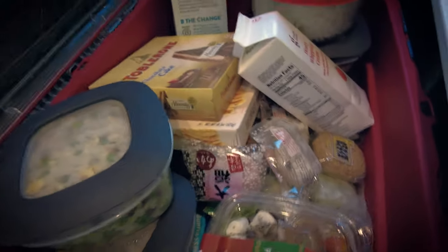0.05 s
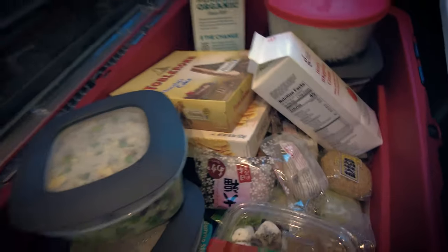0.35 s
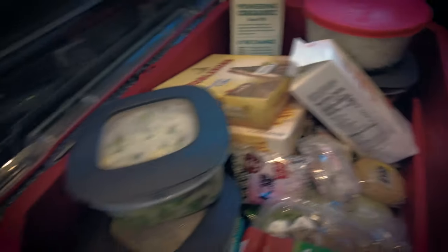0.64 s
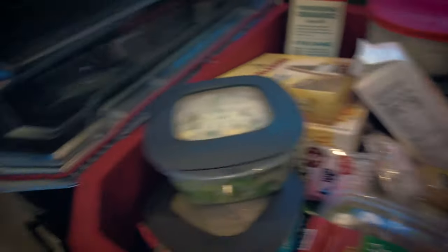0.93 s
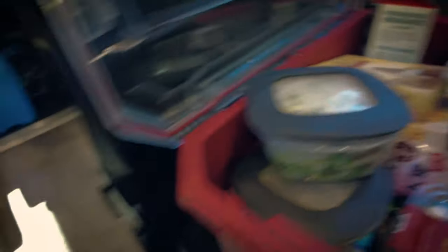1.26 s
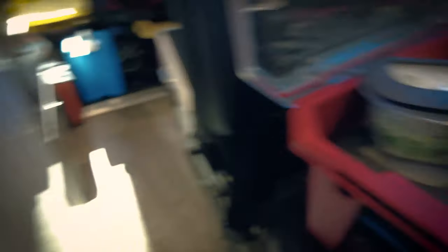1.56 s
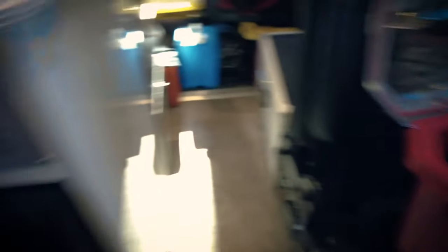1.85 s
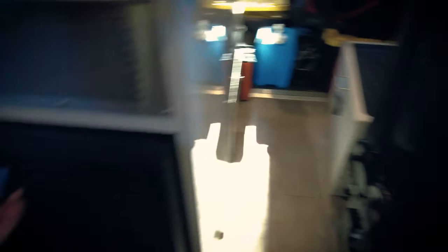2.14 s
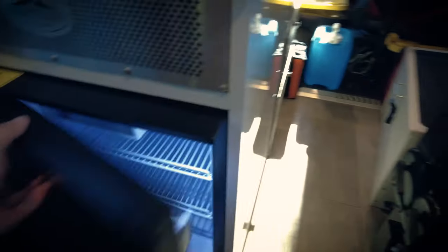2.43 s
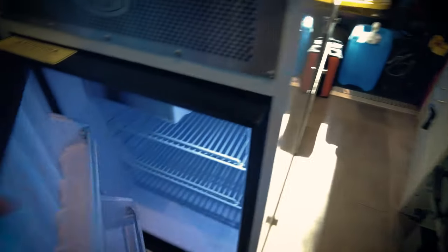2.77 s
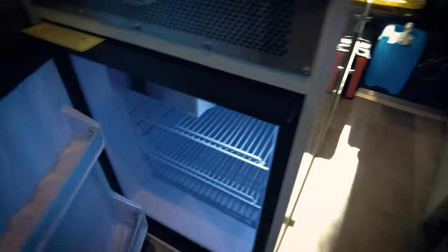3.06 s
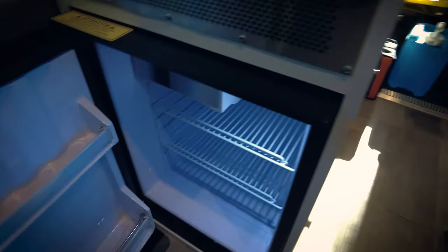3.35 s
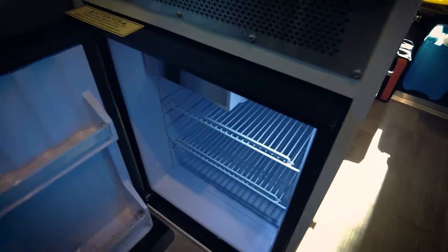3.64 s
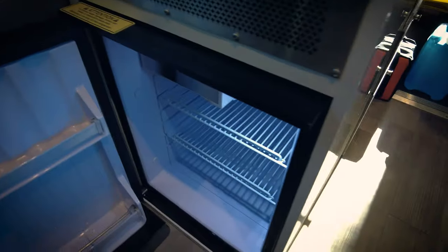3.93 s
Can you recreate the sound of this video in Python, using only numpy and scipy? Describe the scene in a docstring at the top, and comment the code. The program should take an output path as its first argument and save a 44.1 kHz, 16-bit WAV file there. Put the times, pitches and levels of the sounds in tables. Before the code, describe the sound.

A small fridge door opening in a van is the main sound, over a steady low rumble and faint hiss. For the first two seconds there are only soft knocks, clothes rustle and tiny plastic squeaks. At 2.4 seconds the door thuds dully, and at 2.7 the latch snaps loudly as the rubber seal peels away. A faint hum follows, and near 3.9 a hand bumps the microphone.

```python
"""Opening a fridge in a van

A small fridge door is pulled and thuds against its catch. The latch snaps free, and the impact excites
the modes of latch and panel; the rubber seal peels off and the fridge's hum grows louder. Friction
makes clothes rustle and plastic squeak, and small knocks sound over the cabin's low rumble and hiss.
Last, a hand bumps the microphone."""
import sys
import numpy as np
from scipy import signal
from scipy.fft import rfft, irfft
from scipy.io import wavfile

SR = 44100
rng = np.random.default_rng(int(sys.argv[2]) if len(sys.argv) > 2 else 0)


def wav_record(signal):
    """Record a signal, one row per channel, as 16-bit PCM in the file named by sys.argv[1]."""
    frames = np.transpose(np.atleast_2d(signal))
    bounded = np.clip(frames, -1, 1)
    # unit amplitude maps onto the largest positive 16-bit level
    quanta = np.round(bounded * 32767).astype(np.int16)
    wavfile.write(sys.argv[1], SR, quanta)


N = 176400
T = np.arange(N) / SR
FREQS = np.maximum(np.arange(N // 2 + 1) * SR / N, 1)
SNAP_S = 2.6832  # the latch lets go


def latch_snap():
    """Impact excitation: sharp contacts set door and latch ringing, and the cabin reverberates."""
    # contacts of the slipping catch: start_s, level_db
    contacts = [(2.6833, -9.5), (2.6843, -11.5), (2.6871, -19.5), (2.69, -18.5)]
    # spectrum of the snap: frequency_hz, gain_db
    colour = [(90, -35), (170, -23), (250, -0.5), (340, -5.5), (520, -7.5), (700, -3), (1080, -8),
              (1400, -1.5), (1700, -6), (1980, -15.5), (2250, -8.5), (2600, -5), (3200, -4), (4700, -9.5),
              (5900, -18), (9000, -19.5), (12000, -31), (15000, -22.5)]
    # damping of the densely overlapping modes: frequency_hz, t60_s
    damping = [(150, 0.2), (400, 0.12), (1000, 0.15), (3000, .13), (7000, .12), (15000, .11)]
    crack = coloured(white(), colour) * sum(undb(db) * strike(s, 0, t60=0.011) for s, db in contacts)
    ring_spectrum = rfft(coloured(white(), colour))
    log_centres = np.log(np.array(damping)[:, 0])
    ring, rise_s = 0, 0.0011
    for (_, t60), selector in zip(damping, np.eye(len(damping))):
        share = np.interp(np.log(FREQS), log_centres, selector)  # overlapping triangular bands
        ring = ring + irfft(ring_spectrum * share, N) * strike(SNAP_S, rise_s, t60)
    tail = coloured(white(), colour) * strike(SNAP_S, rise=.015, t60=0.29)
    bolt_tick = shaped(white(), band(9700, 28000)) * strike(2.6845, 0, t60=0.0032)  # bolt hits its stop
    return crack + undb(-8.5) * bolt_tick + undb(-10.5) * ring + door_modes(rise_s) + undb(-25.5) * tail


def door_modes(rise_s):
    """Free vibration: each mode of the struck panel and latch is a damped sinusoid."""
    # modes of the door panel: pitch_hz, level_db, t60_s
    panel = [(256, -25, 0.12), (345, -23.5, 0.28), (404, -25.5, 0.18), (600, -22, 0.11), (704, -19, 0.16),
             (854.5, -19.5, 0.21), (941, -21, 0.14), (1202, -19, .13), (1370, -18, 0.11), (1450, -19, .1),
             (1650, -19.5, 0.1), (1742, -24.5, 0.14)]
    # modes of the latch: pitch_hz, level_db, t60_s
    latch = [(1530, -13, 0.017), (2530, -20, 0.1), (2730, -21, .12), (2920, -23.5, 0.11),
             (3020, -16.5, 0.1), (3310, -23.5, .11), (3791, -22.5, 0.12), (4293, -28, 0.13),
             (4870, -19, 0.032)]
    return direct(sum((-1) ** k * undb(db) * damped_sine(hz, SNAP_S, rise_s, t60)
                      for k, (hz, db, t60) in enumerate(panel + latch)))


def door_thuds():
    """Damped oscillation: each jolt of the pulled door sounds one low, dying tone."""
    # jolts of the door: start_s, level_db, pitch_hz, t60_s
    thuds = [(2.429, -20, 69.5, 0.16), (2.461, -27, 94.4, 0.41), (2.54, -25.5, 64.3, 0.23),
             (2.762, -32, 146, 0.14), (2.852, -47.5, 89, 0.33)]
    return direct(sum(undb(db) * damped_sine(hz, s, 0.0063, t60) for s, db, hz, t60 in thuds))


def seal_peel():
    """Adhesive failure: the rubber leaves the frame in many tiny releases that merge into a crackle."""
    # surges of peeling: peak_s, level_db, swell_s, t60_s
    surges = [(2.645, -52.5, 0.016, 0.17), (2.681, -31.5, 0.009, .04), (2.795, -46, 0.038, 0.072),
              (2.828, -37.5, 0.023, 0.12)]
    # spectrum of the peeling rubber: frequency_hz, gain_db
    colour = [(200, 0.5), (650, 0), (950, -13), (1400, 0.5), (2100, -8), (3000, -3.5), (5000, -7),
              (9000, -13.5), (15500, -16.5)]
    return coloured(grains(per_s=6200, spread_db=1.5), colour) * swells(surges)


def handling_clicks():
    """Impulse response: each small knock is a short tick followed by a ring in the cabin."""
    # knocks: start_s, bass_db, middle_db, treble_db, top_db, rise_s, t60_s
    knocks = [(0.376, -39, -54, -66, -73, 0.0029, 0.14), (0.478, -58, -50, -58.5, -64, 0.002, 0.14),
              (0.858, -53, -54.5, -49.5, -62, 0.0023, 0.089), (0.873, -49, -53, -57, -72, 0.0018, 0.087),
              (0.923, -47.5, -53, -53, -55.5, 0.0043, 0.22), (1.170, -49.5, -56, -57.5, -65, 0.0024, 0.32),
              (1.564, -50, -63, -62, -64, 0.003, 0.32), (2.072, -63, -46.5, -54.5, -52.5, 0.002, 0.14),
              (2.167, -62, -55, -53.5, -51.5, 0.0025, 0.19), (2.303, -47.5, -51, -61, -72, 0.0016, 0.13),
              (2.348, -49.5, -51, -61, -62, 0.0065, 0.18),
              (2.4693, -47.5, -44.5, -42.5, -52.5, 0.00088, 0.12),
              (3.103, -48.5, -44.5, -47.5, -60.5, 0.0027, 0.1), (3.727, -41, -40, -49, -58, 0.0051, 0.15),
              (3.855, -34, -36, -43, -45, 0.0035, 0.099)]
    edges_hz = [130, 700, 2200, 5500, 16000]
    bands = [shaped(white(), band(lo, hi) * FREQS ** -.4) for lo, hi in zip(edges_hz, edges_hz[1:])]
    out = 0
    for s, *band_db, rise, t60 in knocks:
        tick = 1.06 * strike(s, rise / 4, t60=0.013)
        noise = sum(undb(db) * part for db, part in zip(band_db, bands))
        out = out + (tick + strike(s, rise, t60)) * noise
    return undb(-1) * out


def clothes_rustle():
    """Sliding friction: cloth catches and slips in fine grains, each band flickering on its own."""
    # spectrum of rubbing cloth: frequency_hz, gain_db
    colour = [(200, -5.5), (500, -1), (950, -6.5), (1600, 3), (2200, -2), (3200, -1.5), (5500, -10.5),
              (9000, -17.5), (15500, -26)]
    # strength of the rustle: time_s, level_db
    levels = [(0, -59), (.27, -79), (.42, -64), (.72, -57), (.82, -70), (.96, -59.5), (1.14, -63),
              (1.28, -65.5), (1.47, -56.5), (1.51, -67), (1.62, -58.5), (1.8, -62), (1.99, -59),
              (2.13, -63), (2.27, -62), (2.39, -65.5), (2.5, -58.5), (2.95, -62.5), (3.2, -67), (3.7, -69),
              (4, -74)]
    # scrapes of cloth and skin: peak_s, level_db, swell_s, t60_s
    scrapes = [(3.882, -40, 0.015, 0.1), (3.975, -47.5, 0.017, 0.1)]
    rub = rfft(coloured(grains(per_s=4400, spread_db=3.7), colour))
    edges_hz = np.geomspace(150, 16000, 8)
    cloth = sum(irfft(rub * band(lo, hi) ** 2, N) * flicker() for lo, hi in zip(edges_hz, edges_hz[1:]))
    return cloth * (curve(levels) + swells(scrapes))


def body_shuffle():
    """Friction noise: a low shuffle swells and fades as the body turns and bends down."""
    # spectrum of the shuffle: frequency_hz, gain_db
    colour = [(50, -17.5), (130, 5), (220, -4), (400, -6), (700, -13.5), (1200, -18.5), (2500, -26),
              (6000, -47.5)]
    # strength of the movement: time_s, level_db
    levels = [(0, -74), (.25, -80), (.45, -49), (.78, -80), (.93, -58), (1.1, -60), (1.6, -53),
              (1.8, -52.5), (2.2, -51.5), (2.5, -44.5), (2.9, -54), (3.2, -58.5), (4, -69)]
    return coloured(white(), colour) * curve(levels)


def scuffs():
    """Forced resonance: each scuff or tap of plastic and shoes drives one band of noise."""
    # rubs and taps: peak_s, level_db, centre_hz, half_width_hz, swell_s, t60_s
    rubs = [(.075, -42, 203, 45, 0.024, 0.14), (.085, -52, 825, 400, 0.019, 0.079),
            (0.378, -42, 740, 350, 0.0011, 0.12), (.482, -45, 910, 110, 0.003, 0.069),
            (.72, -60, 3200, 900, 0.083, 0.5), (.861, -48, 2680, 600, .001, 0.03),
            (0.875, -47.5, 2630, 500, .001, 0.042), (0.879, -48, 320, 150, 0.017, 0.15),
            (.928, -46, 290, 170, .003, .16), (1.036, -55, 1750, 400, 0.01, 0.1),
            (1.173, -51.5, 2160, 450, .001, 0.18), (1.395, -53.5, 4270, 300, .002, 0.037),
            (1.436, -53.5, 1560, 250, .012, .06), (1.527, -46.5, 3000, 700, 0.00091, 0.03),
            (1.566, -43.5, 1510, 280, .001, 0.04), (1.581, -44.5, 1560, 330, 0.0032, 0.084),
            (1.6, -58, 3200, 800, 0.036, 0.58), (1.89, -56.5, 1450, 704, 0.034, 0.63),
            (1.99, -59.5, 2490, 900, 0.054, .25), (2.305, -43.5, 874, 170, .001, 0.09),
            (2.344, -51, 1500, 250, .005, 0.098), (2.412, -45, 770, 150, 0.017, 0.11),
            (2.615, -59, 1335, 249, .005, .07), (3.859, -33, 256, 90, .003, .15),
            (3.861, -37.5, 710, 139, .003, 0.13)]
    return sum(resonance(hz, width) * swells([(s, db, up, t60)]) for s, db, hz, width, up, t60 in rubs)


def microphone_bump():
    """Structure-borne sound: a hand shifts its grip and sends a deep rumble into the microphone."""
    # spectrum of the grip noise: frequency_hz, gain_db
    colour = [(15, -0.5), (30, 2), (46, -8), (62, -6.5), (95, -7.5), (128, -22.5), (180, -19), (235, -31.5),
              (300, -30.5), (380, -40.5), (1000, -51), (3000, -67)]
    start_s, rise_s = 3.848, 0.011
    return undb(-20) * coloured(white(), colour) * np.clip((T - start_s) / rise_s, 0, 1)


def squeaks():
    """Stick-slip oscillation: rubbed plastic gives short rising tones of unsteady pitch."""
    # upward glides: start_s, length_s, level_db, start_hz, end_hz
    glides = [(1.445, 0.039, -54, 1490, 1614), (1.534, .06, -58, 3230, 3500), (1.61, .036, -64, 3450, 3600)]
    jitter_hz = 110 * wander(per_s=540, draws=N)
    out = 0
    for s, length, db, start_hz, end_hz in glides:
        progress = np.clip((T - s) / length, 0, 1)
        pitch_hz = start_hz + (end_hz - start_hz) * progress + jitter_hz
        phase = 2 * np.pi * np.cumsum(pitch_hz) / SR
        out = out + undb(db) * np.sqrt(2) * np.sin(np.pi * progress) * np.sin(phase)
    return direct(out)


def cabin_rumble():
    """Amplitude modulation: low noise in the cabin slowly rises and falls."""
    # spectrum ahead of the band-pass: frequency_hz, gain_db
    colour = [(11, -30), (18, 2), (40, 0), (55, -3), (70, -14.5), (91, -8), (114, -22.5), (140, -24),
              (168, -25), (217, -17), (247, -25.5), (325, -34), (400, -24), (520, -61), (880, -120)]
    # strength of the rumble: time_s, level_db
    levels = [(0, -38.5), (1.15, -36), (1.45, -40), (2.6, -39), (3.2, -36.5), (4, -42.5)]
    return curve(levels) * shaped(white(), undb(at(colour, FREQS)) * band(5.3, 260))


def fridge_hum():
    """Transmission loss: the door muffles the hum until it opens; a thin whine flickers above."""
    # narrow bands of the hum: centre_hz, level_db, half_width_hz
    peaks = [(133, -56.5, 6.4), (223, -67.5, 5), (332, -62.5, 12.25), (658, -65, 13), (764, -67.5, 19),
             (1310, -73, 30), (3170, -75, 110)]
    # strength of the whine: time_s, level_db
    whine_levels = [(3.2, -87.5), (3.37, -76), (3.58, -82), (3.7, -73.5), (3.76, -85)]
    hum = sum(undb(db) * resonance(hz, width) for hz, db, width in peaks)
    door_gain = curve([(SNAP_S, -8), (SNAP_S + .2, 0)])
    whine = curve(whine_levels) * flicker() * resonance(hz=11900, half_width=50)
    return hum * door_gain + whine


def air_and_hiss():
    """Broadband noise: a steady floor of air lies under a high hiss that comes and goes."""
    # spectrum of the cabin air: frequency_hz, gain_db
    air_colour = [(150, -9), (320, -5.5), (500, -7.5), (1000, -12.5), (2000, -22), (4000, -25.5),
                  (15000, -30.5)]
    # spectrum of the hiss: frequency_hz, gain_db
    hiss_colour = [(2000, -17.5), (5000, 2), (8000, 3), (11000, -1), (15000, -1.5)]
    # strength of the hiss: time_s, level_db
    hiss_levels = [(0, -65.5), (.22, -65), (.29, -81), (.6, -77), (.7, -58.5), (.83, -79), (.96, -64.5),
                   (1.15, -67), (1.38, -64), (1.52, -68.5), (1.65, -64), (1.82, -75), (2.0, -71),
                   (2.4, -69.5), (2.95, -62), (3.45, -76), (3.7, -71), (3.85, -62.5)]
    air = undb(-60) * coloured(white(), air_colour)
    return air + curve(hiss_levels) * coloured(white(), hiss_colour)


def microphones(pair):
    """Sum and difference: a (direct, diffuse) pair becomes partly coherent left and right channels."""
    # likeness of the two channels: frequency_hz, correlation
    likeness = [(30, .975), (70, .99), (130, .95), (250, .82), (600, .55), (1400, .55), (3000, .4),
                (8000, .05)]
    # level of left over right: frequency_hz, difference_db
    balance = [(30, -2.6), (70, -.4), (250, .5), (600, 2), (2000, 1.6), (5000, 3), (14000, 2)]
    # phase of left ahead of right: frequency_hz, lead_rad
    lead = [(190, 0), (350, .5), (520, 1.5), (920, 2), (1350, .7), (2500, .2), (5000, 0)]
    common, diffuse = rfft(pair)
    side = np.array([[1], [-1]])
    correlation = at(likeness, FREQS)
    response = undb(side * at(balance, FREQS) / 2) * np.exp(1j * side * at(lead, FREQS) / 2)
    mix = common * np.sqrt((1 + correlation) / 2) + side * diffuse * np.sqrt((1 - correlation) / 2)
    return irfft(response * mix, N)


def direct(x):
    """A coherent sound: all direct part, no diffuse part."""
    return np.array([x, np.zeros(N)])


def undb(db):
    """Decibels to amplitude ratio."""
    return 10 ** (np.asarray(db) / 20)


def at(points, hz):
    """Interpolate (frequency_hz, value) points on a logarithmic frequency axis."""
    frequencies, values = np.array(points).T
    return np.interp(np.log(hz), np.log(frequencies), values)


def curve(points):
    """Amplitude envelope through (time_s, level_db) points."""
    return undb(np.interp(T, *np.array(points).T))


def white():
    """Two uncorrelated white noises."""
    return rng.standard_normal((2, N))


def grains(per_s, spread_db, t60=.012):
    """Shot noise: tiny random bursts of uneven size add in power to form a rasp."""
    onsets = rng.random((2, N)) < per_s / SR
    sizes = onsets * undb(spread_db * np.minimum(rng.exponential(size=(2, N)), 4))
    power_decay = np.exp(-2 * np.log(1000) / (t60 * SR))
    return white() * np.sqrt(signal.lfilter([1], [1, -power_decay], sizes ** 2))


def shaped(x, gain):
    """Linear filtering by a gain at each frequency; rms 1."""
    y = irfft(rfft(x) * gain, N)
    return y / np.sqrt(np.mean(y ** 2))


def coloured(x, points):
    """Spectral shaping by (frequency_hz, gain_db) points; rms 1."""
    return shaped(x, undb(at(points, FREQS)))


def band(lo, hi):
    """Magnitude response of a band-pass with fifth-order slopes."""
    return 1 / np.sqrt((1 + (lo / FREQS) ** 10) * (1 + (FREQS / hi) ** 10))


def resonance(hz, half_width):
    """Narrow-band noise around one resonant peak; rms 1."""
    return shaped(white(), 1 / (1 + ((FREQS - hz) / half_width) ** 2))


def strike(start, rise, t60):
    """Impact envelope: linear rise, exponential decay."""
    age = np.maximum(T - start, 0)
    return np.minimum(age / max(rise, 1 / SR), 1) * np.exp(-np.log(1000) * age / t60)


def damped_sine(hz, start, rise, t60):
    """Free decay of one struck mode."""
    return np.sin(2 * np.pi * hz * (T - start)) * strike(start, rise, t60)


def swells(rows):
    """Envelope of rubs that grow and decay exponentially about their peaks."""
    return sum(undb(db) * np.exp(-np.maximum(s - T, 0) / up - np.log(1000) * np.maximum(T - s, 0) / t60)
               for s, db, up, t60 in rows)


def wander(per_s, draws=1000):
    """Random drift: straight lines between evenly spaced, normally distributed values."""
    knots = np.arange(0, N / SR + 1, 1 / per_s)
    return np.interp(T, knots, rng.standard_normal(draws)[:len(knots)])


def flicker(depth_db=2):
    """Random amplitude modulation: a gain that wavers quickly."""
    return undb(depth_db * wander(per_s=22))


def scene():
    """Superposition: all sources in the van add at two microphones."""
    door = latch_snap() + door_thuds() + seal_peel()
    handling = handling_clicks() + clothes_rustle() + body_shuffle() + scuffs()
    handling += microphone_bump() + squeaks()
    background = cabin_rumble() + fridge_hum() + air_and_hiss()
    return microphones(door + handling + background)


def record(dry, cutoff_hz=15700):
    """Saturation and band limiting: peaks stop at full scale and a steep low-pass cuts the top."""
    low_pass = signal.ellip(10, .1, 80, cutoff_hz, fs=SR, output="sos")
    return signal.sosfilt(low_pass, np.clip(dry, -1, 1))


dry = scene()
out = record(dry)
wav_record(out)
```